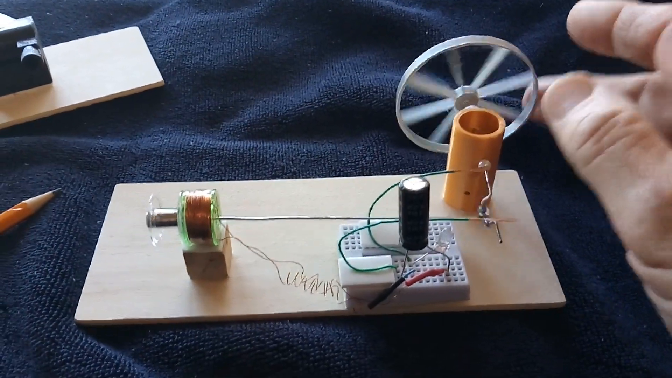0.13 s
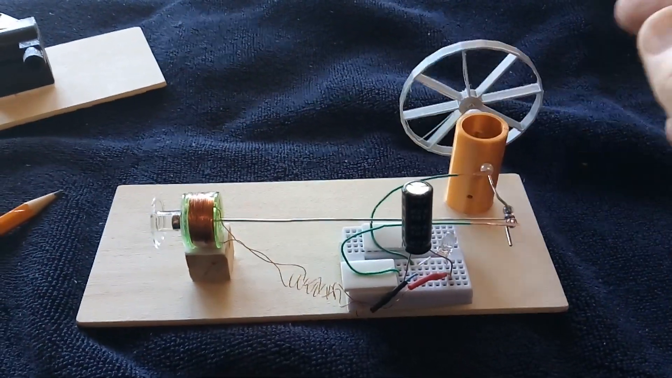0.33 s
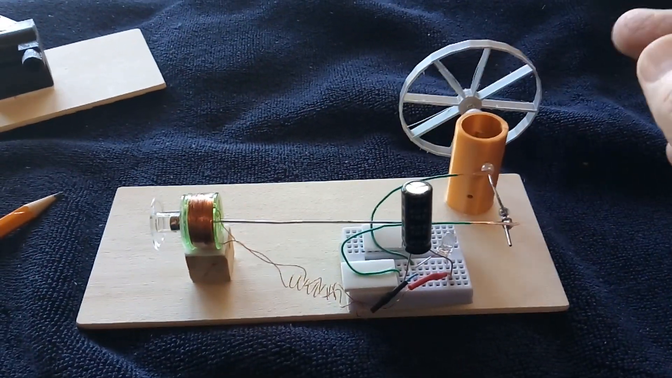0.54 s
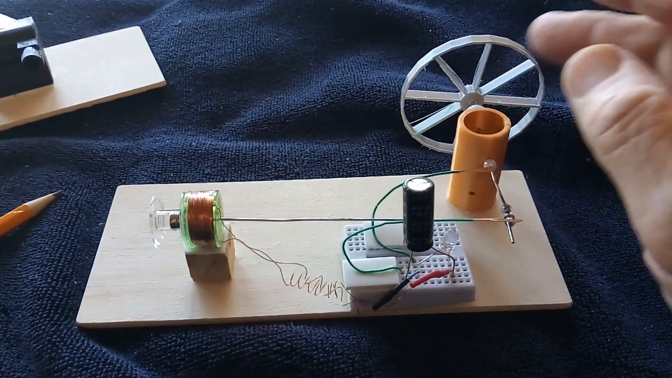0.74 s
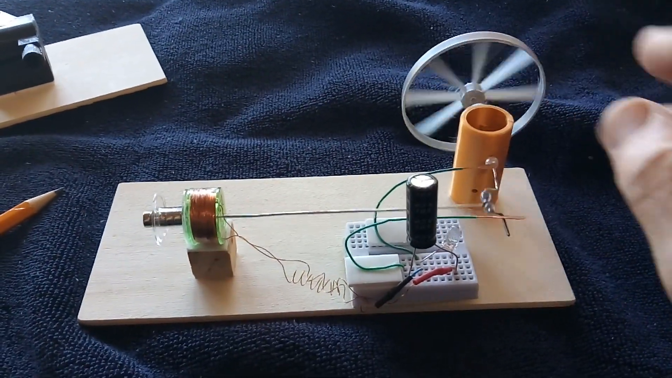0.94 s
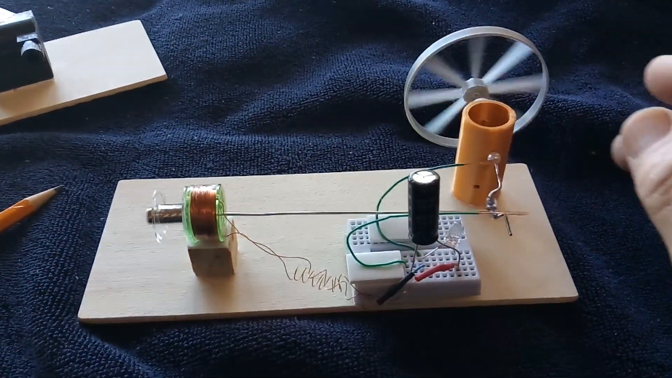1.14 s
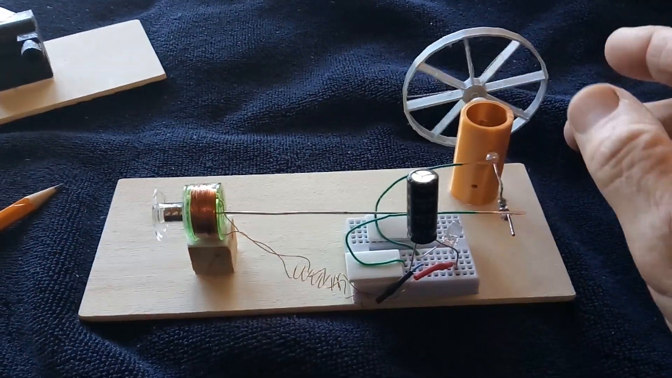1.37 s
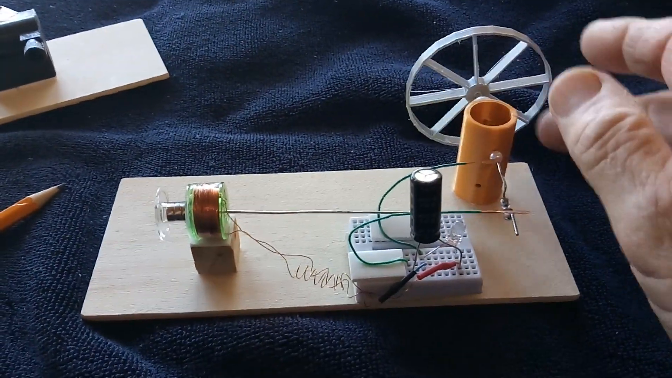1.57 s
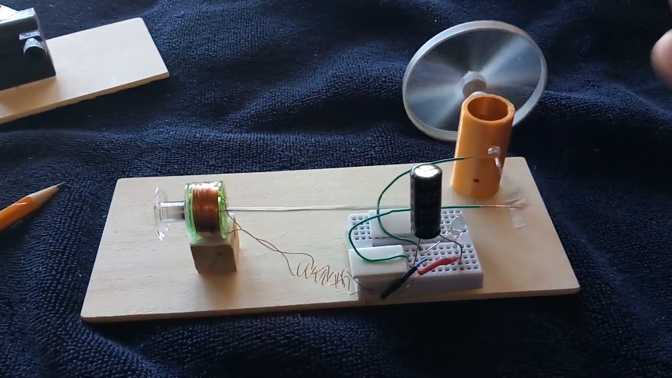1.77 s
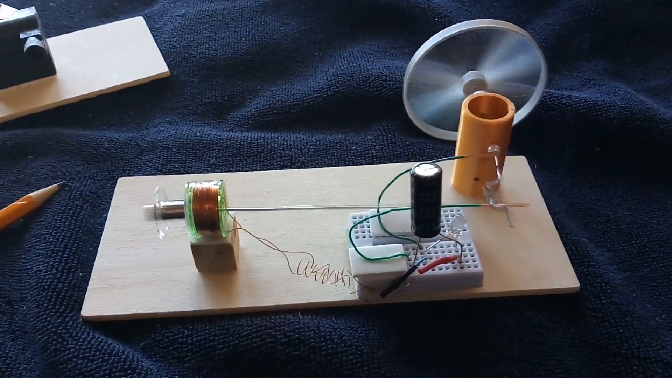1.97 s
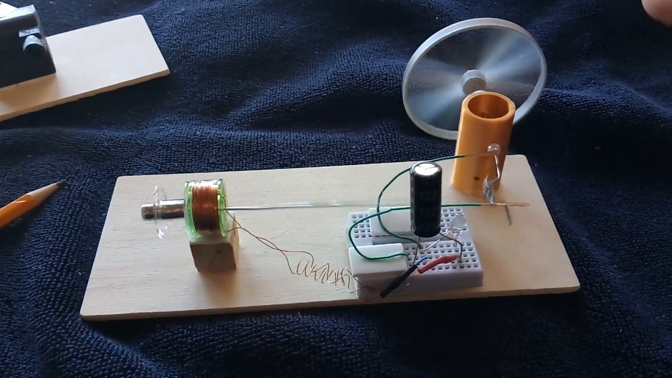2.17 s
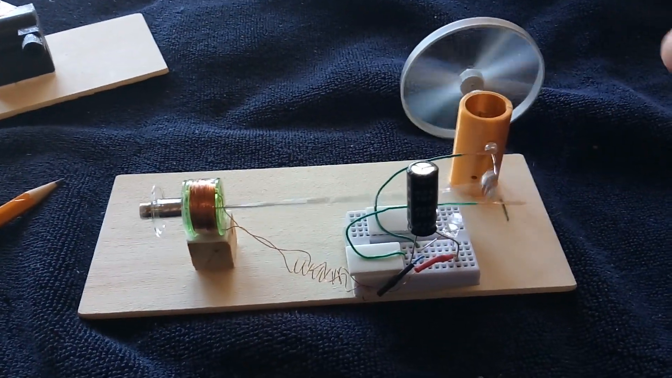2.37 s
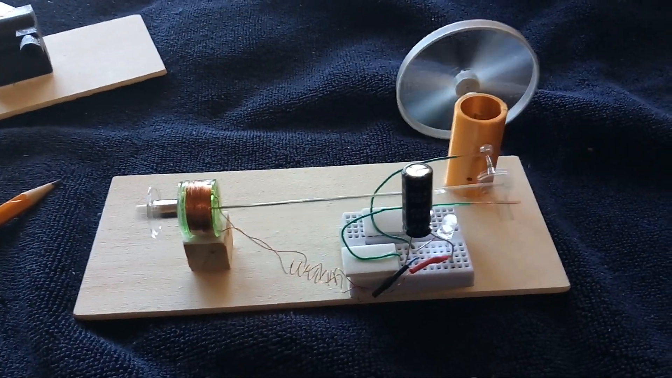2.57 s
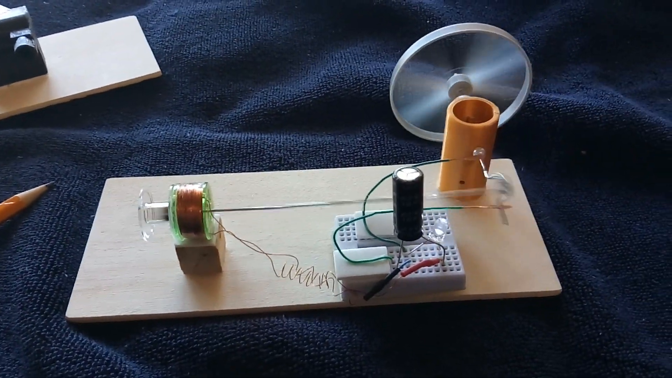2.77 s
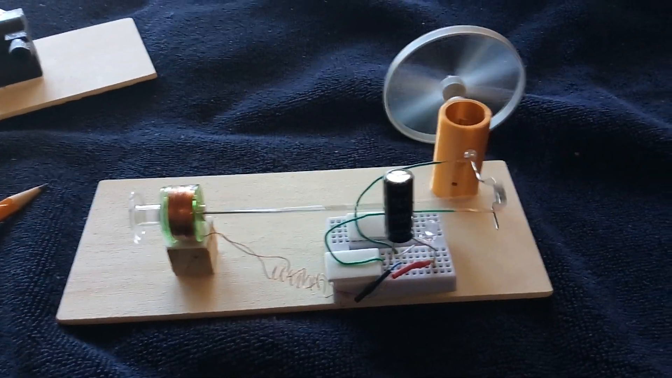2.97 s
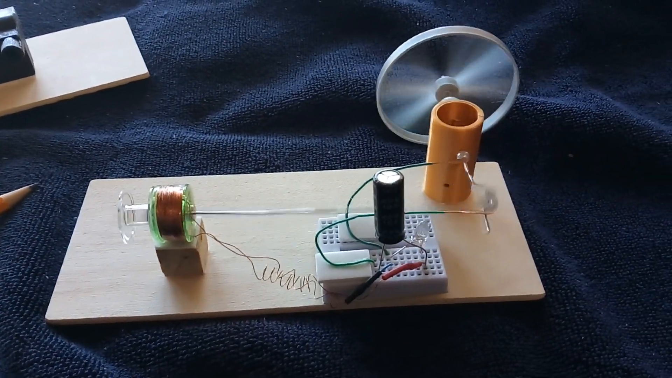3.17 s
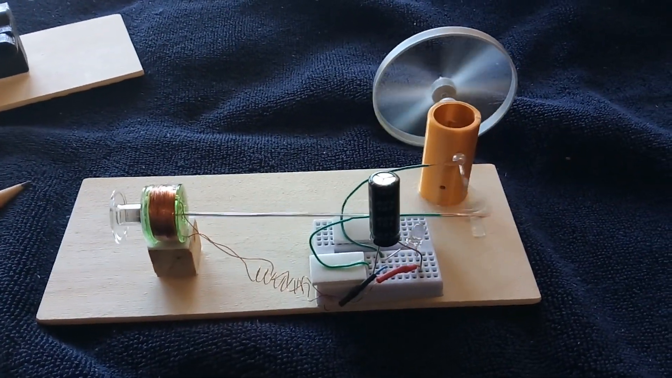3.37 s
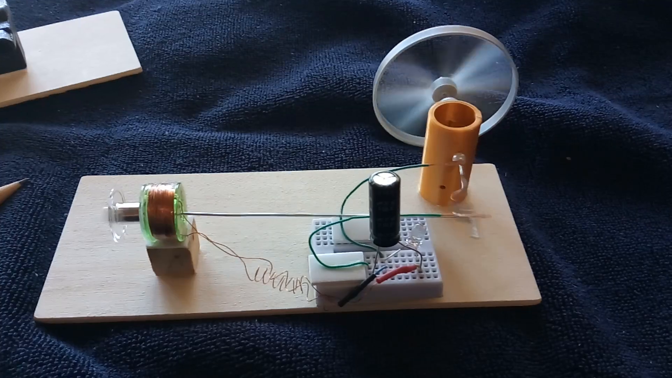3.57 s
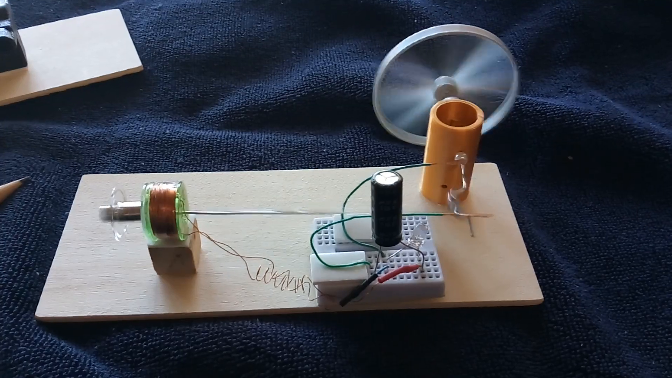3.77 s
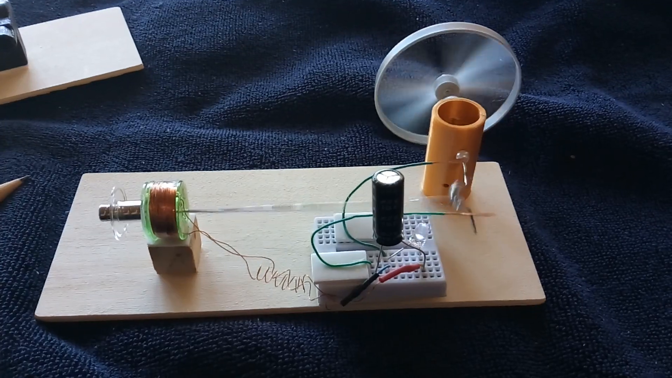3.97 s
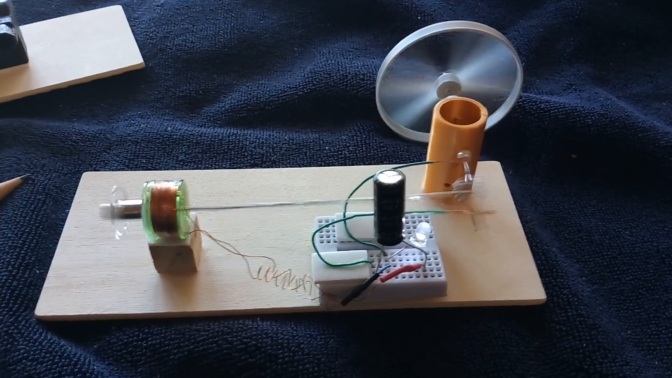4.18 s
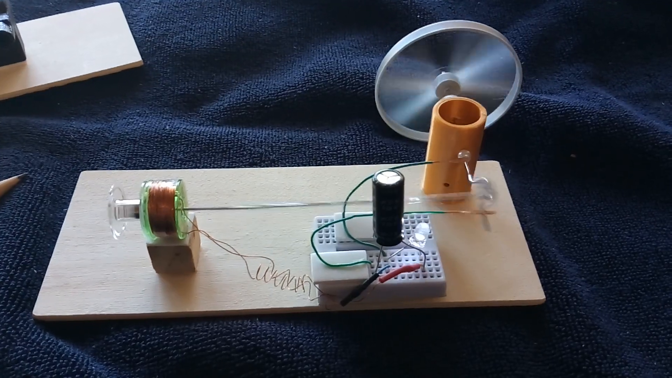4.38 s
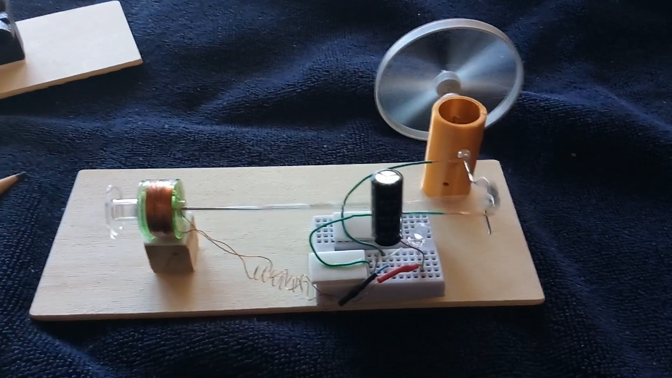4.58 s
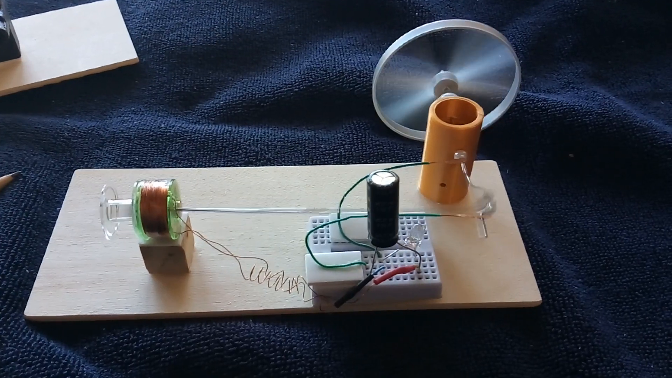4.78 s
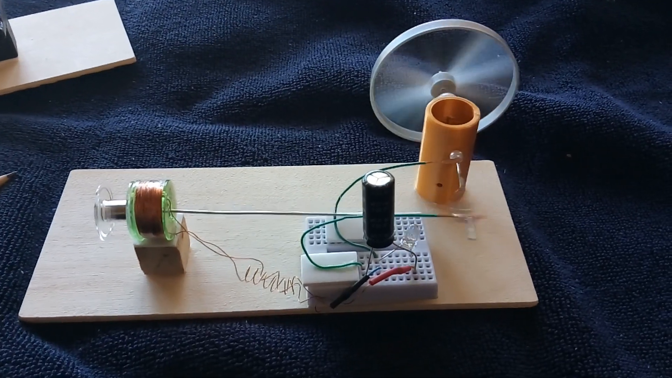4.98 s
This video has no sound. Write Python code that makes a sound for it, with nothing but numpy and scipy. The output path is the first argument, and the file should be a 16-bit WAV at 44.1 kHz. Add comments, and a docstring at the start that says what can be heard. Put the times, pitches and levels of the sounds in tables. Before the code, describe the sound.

Close up in a quiet room, a little metal flywheel is rocked, making soft taps and a faint scrape. Then the small electric engine it belongs to starts, and its steel rod and loose crank chatter in a fast, regular clicking that resonates through a wooden base. Toward the end, extra knocks join in and the clatter gets louder and sharper.

```python
"""Small solenoid engine on a wooden board, close to a hand-held microphone in a quiet room.
A finger flicks the flywheel, the linkage knocks a few times, then the coil catches and pulls about
nine times a second. Each pull makes the loose crank chatter, ringing the board and the steel rod.
Later the play grows: the rod also knocks on its way back and just ahead of each stroke."""
import sys
import numpy as np
from scipy import signal
from scipy.fft import rfft, irfft
from scipy.io import wavfile

SR = 44100
rng = np.random.default_rng(int(sys.argv[2]) if len(sys.argv) > 2 else 0)


def digitize_waveform(pressure):
    """Quantize a signal to 16-bit integers and store it at the path in sys.argv[1].

    Rows of a 2-D input are taken as channels; values are limited to [-1, 1].
    """
    field = np.atleast_2d(pressure).T
    bounded = np.clip(field, -1, 1)
    quanta = np.round(bounded * 32767).astype(np.int16)
    wavfile.write(sys.argv[1], SR, quanta)


N = 221081
TIME = np.arange(N) / SR
RING_SAMPLES = 2048
LOOSE_FROM_S = 4.27

# flywheel speed from the first pull on (time [s], speed [turns/s])
SPEED = [(1.74, 7.42), (1.957, 9.329), (2.202, 9.432), (2.466, 9.439), (2.949, 9.189), (3.042, 9.534),
         (4.287, 9.253), (4.573, 9.478), (4.688, 9.17)]


def undb(db):
    """Decibels to gain."""
    return 10 ** (np.asarray(db) / 20)


def level(x, db):
    """Scale to an rms level."""
    return x * undb(db) / np.sqrt(np.mean(x ** 2))


def add(out, t, x):
    """Mix x into out from time t."""
    i = int(np.clip(t * SR, 0, N))
    out[i:i + len(x)] += x[:N - i]


def turn_starts():
    """Times at which the flywheel starts a turn and the coil fires."""
    times, rates = np.transpose(SPEED)
    running = TIME[TIME >= times[0]]
    turns = np.cumsum(np.interp(running, times, rates)) / SR
    return np.interp(np.arange(int(turns[-1]) + 1), turns, running)


def each_turn(phase, scatter_s):
    """Times at which the crank passes one phase, given in turns."""
    starts = turn_starts()
    return starts[:-1] + phase * np.diff(starts) + scatter_s * rng.standard_normal(len(starts) - 1)


def force_at(curve, t):
    """Board and steel levels of a force curve at time t."""
    times, board_db, steel_db = np.transpose(curve)
    return np.interp(t, times, board_db), np.interp(t, times, steel_db)


def body(modes, low_hz, high_hz, order):
    """Response of damped modes (frequency [Hz], width [Hz], gain [dB]) radiating between two edges."""
    s = 1j * np.fft.rfftfreq(RING_SAMPLES, 1 / SR)
    ring = sum(undb(db) * s * width / (s * s + s * width + hz * hz) for hz, width, db in modes)
    b, a = signal.butter(order, [low_hz, high_hz], "band", analog=True)
    return ring * np.polyval(b, s) / np.polyval(a, s)


def chatter(response, delays_s, sizes, db, span_s=.008):
    """Quick contacts ring a body; db is the level of their energy spread over span_s."""
    hz = np.fft.rfftfreq(RING_SAMPLES, 1 / SR)
    force = sizes @ np.exp(-2j * np.pi * np.outer(delays_s, hz))
    ring = irfft(response * force)
    return ring * undb(db) * np.sqrt(span_s * SR / np.sum(ring ** 2))


def blow(bodies, contacts, chatter_hz, levels_db, uneven_db=2.0):
    """Metal bounces in a loose joint: the board knocks, the rod rings, the contact faces crack."""
    delay, scatter, board_db, steel_db = np.transpose(contacts)
    chance = rng.standard_normal((3, len(delay)))
    delays_s = np.abs(delay + scatter * chance[0]) / chatter_hz
    board = undb(board_db + uneven_db * chance[1])
    steel = undb(steel_db + uneven_db * chance[2])
    parts = zip(bodies, (board, steel, steel), levels_db)
    return sum(chatter(part, delays_s, sizes, db) for part, sizes, db in parts)


def stick_slip(grain_db=-6.5, density=.056):
    """Force of a sliding contact: dense tiny slips of uneven size."""
    slips = rng.standard_normal(N) * undb(grain_db * np.minimum(rng.exponential(size=N), 4))
    return slips * (rng.random(N) < density)


def rub(response, force, db):
    """A friction force rings a body, at an rms level."""
    return level(signal.fftconvolve(force, irfft(response))[:N], db)


def room_tone(air_db=-65.5, waver_db=-3.0):
    """Soft steady air noise with a faint wavering hum."""
    # air spectrum (frequency [Hz], relative density [dB])
    spectrum = [(25, -11.5), (45, -8), (70, -2), (115, 0.5), (170, -2.5), (380, -6), (500, -13.5),
                (1000, -15.5), (3000, -20.5), (6500, -23.5), (8700, -36.5), (13700, -38), (15200, -25)]
    # hum and a thin whine (frequency [Hz], level [dB])
    hum = [(118, -85.5), (296, -79.5), (355.3, -76), (414, -80), (8226, -93.5)]
    hz, db = np.transpose(spectrum)
    colour = undb(np.interp(np.log(np.fft.rfftfreq(N, 1 / SR) + 1), np.log(hz), db))
    out = level(irfft(rfft(rng.standard_normal(N)) * colour, N), air_db)
    for hz, db in hum:
        waver = np.interp(TIME, np.linspace(0, N / SR, 20), rng.standard_normal(20))
        tone = np.sin(2 * np.pi * (hz * TIME + rng.random()))
        out += level(tone * undb(waver_db * waver), db)
    return out


def sliding(bodies, levels_db=(-4, -3, -24)):
    """Axle and plunger friction: a swell for each rock of the wheel, then a steady hiss."""
    # finger rocks the wheel (time [s], length [s], peak gain [dB])
    rocks = [(0.168, 0.12, -72), (0.778, 0.41, -65), (1.15, 0.36, -75.5)]
    # friction while running (time [s], gain [dB])
    slide = [(1.6, -90), (1.68, -52.5), (3, -52.5), (5, -57.5)]
    force = stick_slip(grain_db=5.0, density=.05)
    hiss = sum(rub(part, force, db) for part, db in zip(bodies, levels_db))
    motion = undb(np.interp(TIME, *np.transpose(slide))) * (TIME > slide[0][0])
    for t, length_s, db in rocks:
        add(motion, t, undb(db) * np.sin(np.linspace(0, np.pi, int(length_s * SR))))
    return hiss * motion


def axle_bumps(scatter_s=.00006, rebound_db=-4):
    """The rocking axle bumps its bearing, rings the post and settles in weakening rebounds."""
    # bumps (time [s], level [dB], rebound interval [s])
    bumps = [(0.2456, -54.5, 0.00099), (.858, -64, 0.00099), (0.8842, -41, 0.003), (.8917, -42, 0.0011),
             (0.9415, -57.5, 0.00047), (1.1782, -46, 0.00091)]
    # wheel post modes (frequency [Hz], width [Hz], gain [dB])
    post_modes = [(690, 110, 9), (970, 150, 9.5), (2080, 120, 5.5), (2420, 280, -23), (4480, 190, 0)]
    post = body(post_modes, low_hz=580, high_hz=4200, order=4)
    out, bounces = np.zeros(N), np.arange(4)
    for t, db, interval_s in bumps:
        delays_s = bounces * (interval_s + scatter_s * rng.standard_normal())
        add(out, t, chatter(post, delays_s, undb(rebound_db * bounces), db))
    return out


def clack(bodies, board_db, steel_db, crack_db=-28, chatter_hz=1020):
    """One knock of the rod in its play."""
    # bounces (delay [chatter periods], scatter [chatter periods], board gain [dB], steel gain [dB])
    contacts = [(0, 0.0069, -7.5, -5), (0.879, 0.044, -8, -7), (2.401, 0.36, -7.5, -8),
                (3, 0.38, -6.5, -23), (4.7, 0.596, -15, -27)]
    return blow(bodies, contacts, chatter_hz, (board_db, steel_db, steel_db + crack_db))


def stray_knocks(bodies):
    """The slack linkage knocks as the wheel is flicked, the coil catches and the joint works loose."""
    # knocks (time [s], board level [dB], steel level [dB])
    knocks = [(0.8835, -47, -40), (1.7089, -46.5, -45), (1.7992, -36, -38), (1.915, -48, -52),
              (1.992, -36.5, -32.5), (4.23, -30.5, -32.5)]
    out = np.zeros(N)
    for t, board_db, steel_db in knocks:
        add(out, t, clack(bodies, board_db, steel_db))
    return out


def contact_wire(scatter_s=.0007, brush_s=.00219, uneven_db=3.5):
    """The crank brushes the springy contact wire, which pings softly."""
    # wire modes (frequency [Hz], width [Hz], gain [dB])
    wire_modes = [(4620, 370, 3), (5530, 1100, -9), (6070, 320, 9), (6270, 310, -21)]
    # drag as the wheel swings back (time [s], level [dB])
    drag = [(.98, -99), (1.02, -62), (1.035, -61.5), (1.055, -76), (1.1, -72), (1.16, -91)]
    # touches before each stroke (phase [turns], level [dB])
    touches = [(.85, -48), (.928, -51), (.966, -82)]
    wire = body(wire_modes, low_hz=4670, high_hz=7530, order=3)
    out = rub(wire, stick_slip(), 0) * undb(np.interp(TIME, *np.transpose(drag)))
    for phase, db in touches:
        for t in each_turn(phase, scatter_s):
            delays_s, sizes = brush_s * rng.random(size=6), rng.standard_normal(size=6)
            add(out, t, chatter(wire, delays_s, sizes, db + uneven_db * rng.standard_normal()))
    return out


def sizzle(sizzle_db=-62, lead_s=.024, length_s=.059, uneven_db=1.5, speed_power=4.3):
    """A faint, very high sizzle swells around each stroke, stronger at speed."""
    band = body([(15100, 600, 0)], low_hz=14100, high_hz=15700, order=2)
    gate, swell = np.zeros(N), np.hanning(int(length_s * SR))
    for t in turn_starts():
        speed_ratio = np.interp(t, *np.transpose(SPEED)) / SPEED[-1][1]
        gain = speed_ratio ** speed_power * undb(uneven_db * rng.standard_normal())
        add(gate, t - lead_s, swell * gain)
    return gate * rub(band, stick_slip(), sizzle_db)


def strokes(bodies, chatter_hz=1033, spread=.039, loose_lag_s=.0047,
            crack_db=-29, thud_db=-25, knee_db=-26, hardening=3.13):
    """The coil snatches the plunger through the slack; hard pulls crack brighter and jolt the board."""
    # pull eases, then grows as the joint loosens (time [s], board level [dB], steel level [dB])
    pull = [(1.74, -30.5, -34), (1.92, -25, -26), (2.75, -26.5, -29.5), (3.05, -26.5, -28.5),
            (3.75, -29, -29.5), (4.22, -30, -36.5), (4.43, -23.5, -22.5), (4.97, -22, -24)]
    # bounces (delay [chatter periods], scatter [chatter periods], board gain [dB], steel gain [dB])
    contacts = [(0, 0.029, -5, -3), (.84, 0.032, -1, -11), (1.03, 0.028, -6, -36), (1.502, 0.145, -14.5, 1),
                (1.968, 0.1, -3, -12.5), (2.602, 0.151, -8.5, -3), (4.6, 0.452, -11, -8.5),
                (5.4, 0.422, -11, -3.5)]
    jolt = body([(437, 340, -25), (677, 124, -1)], low_hz=360, high_hz=787, order=2)
    out = np.zeros(N)
    for start in turn_starts():
        t = start + loose_lag_s * (start > LOOSE_FROM_S)
        board_db, steel_db = force_at(pull, t)
        bounce_hz = chatter_hz * (1 + spread * rng.standard_normal())
        force_db = board_db + hardening * max(board_db - knee_db, 0)
        add(out, t, blow(bodies, contacts, bounce_hz, (board_db, steel_db, force_db + crack_db)))
        add(out, t, chatter(jolt, np.zeros(1), np.ones(1), force_db + thud_db))
    return out


def linkage_ticks(bodies, trim_db=-2.0, scatter_s=.0008, uneven_db=4.0, chatter_hz=1150):
    """Light contacts come round at the same crank angles on every turn."""
    # ticks before trim (phase [turns], board level [dB], steel level [dB], crack level [dB])
    ticks = [(.095, -41, -42, -70), (.175, -41.5, -50, -85), (0.234, -54.5, -66, -86),
             (0.312, -63, -69, -85), (0.349, -52.5, -65, -88), (0.461, -52.5, -45.5, -98),
             (0.498, -43, -54, -100), (.56, -50.5, -68, -88), (.73, -44, -87, -98)]
    # bounces (delay [chatter periods], scatter [chatter periods], board gain [dB], steel gain [dB])
    contacts = [(0, 0.07, 11.5, 3), (0.902, 0.078, -3.5, 4), (2.2, 0.55, 10.5, -26)]
    out = np.zeros(N)
    for phase, *base_db in ticks:
        for t in each_turn(phase, scatter_s):
            levels_db = np.array(base_db) + trim_db + uneven_db * rng.standard_normal()
            add(out, t, blow(bodies, contacts, chatter_hz, levels_db))
    return out


def plunger_scrape(bodies, phase=.655, scatter_s=.0008, length_s=.0029,
                   board_db=-44, steel_db=-54, squeak_db=-61):
    """At the end of its travel the plunger scrapes in the coil, with a thin high squeak."""
    board, steel, _ = bodies
    squeak = body([(10160, 1100, 0)], low_hz=8900, high_hz=11500, order=2)
    out = np.zeros(N)
    for t in each_turn(phase, scatter_s):
        delays_s, sizes = length_s * rng.random(size=9), rng.standard_normal(size=9)
        for part, db in ((board, board_db), (steel, steel_db), (squeak, squeak_db)):
            add(out, t, chatter(part, delays_s, sizes, db))
    return out


def rebounds(bodies, from_s=2.25, after_s=.0215, scatter_s=.003,
             board_db=-40.5, steel_db=-42, uneven_db=1.5):
    """At full speed, until the joint works loose, the rod bounces back once after each stroke."""
    out, starts = np.zeros(N), turn_starts()
    for t in starts[(starts > from_s) & (starts < LOOSE_FROM_S)]:
        late, hard = rng.standard_normal(2)
        knock = clack(bodies, board_db + uneven_db * hard, steel_db + uneven_db * hard)
        add(out, t + after_s + scatter_s * late, knock)
    return out


def return_knocks(bodies, phase=.438, scatter_s=.0003, ping_db=-8):
    """Once the play has grown, the rod falls through it on every way back, with a short ping."""
    # return force (time [s], board level [dB], steel level [dB])
    force = [(3.7, -53, -47), (3.83, -33, -34.5), (4.05, -37, -38.5), (4.18, -28.5, -26.5),
             (4.9, -36, -28.5)]
    ping = body([(4640, 120, 0)], low_hz=4200, high_hz=5300, order=2)
    out = np.zeros(N)
    for t in each_turn(phase, scatter_s):
        if t > force[0][0]:
            board_db, steel_db = force_at(force, t)
            add(out, t, clack(bodies, board_db, steel_db))
            add(out, t, chatter(ping, np.zeros(1), np.ones(1), steel_db + ping_db))
    return out


def early_knocks(bodies, lead_s=.0062, scatter_s=.0005, board_db=-36.5, steel_db=-34.5):
    """The loose joint knocks just ahead of each stroke."""
    out, starts = np.zeros(N), turn_starts()
    for t in starts[starts > LOOSE_FROM_S]:
        add(out, t - lead_s + scatter_s * rng.standard_normal(), clack(bodies, board_db, steel_db))
    return out


def frame(x, notch_hz=2870, notch_q=14, notch_depth=.55):
    """Metal parts ring in sympathy through the frame; the board radiates less at one antiresonance."""
    # copper post and flywheel modes (frequency [Hz], width [Hz], gain [dB])
    modes = [(3640, 10, 4), (4440, 13, -25), (8330, 97, 4)]
    x = x + sum(undb(db) * signal.lfilter(*signal.iirpeak(hz, hz / width, fs=SR), x)
                for hz, width, db in modes)
    return x - notch_depth * signal.lfilter(*signal.iirpeak(notch_hz, notch_q, fs=SR), x)


def room(x, near_db=-14.0, near_t60_s=.067, far_db=-18.0, far_t60_s=.24, gap_s=.003, places=9):
    """Near reflections and a short tail; their pattern changes as the microphone drifts."""
    t, out = TIME[:SR // 2], x
    for place in range(places):
        response = 0
        for db, t60_s in ((near_db, near_t60_s), (far_db, far_t60_s)):
            tail = rng.standard_normal(len(t)) * np.exp(-np.log(1000) * t / t60_s) * (t > gap_s)
            response = response + undb(db) * tail / np.linalg.norm(tail)
        nearness = np.maximum(1 - np.abs(np.linspace(0, places - 1, N) - place), 0)
        out = out + signal.oaconvolve(x * np.sqrt(nearness), response)[:N]
    return out


def scene():
    """The linkage strikes and rubs board, rod and contact faces in a quiet room."""
    # modes of board, rod and contact faces (frequency [Hz], width [Hz], gain [dB])
    board_modes = [(711, 113, 3.5), (917, 145, 1), (1049, 320, 5.5), (1423, 175, -2), (1684, 510, -4),
                   (1953, 390, -1.5), (2420, 44, -8), (2580, 25, -1.5), (3000, 65, -6.5),
                   (3760, 120, -10.5), (4860, 37, -34.5)]
    steel_modes = [(4394, 430, 0), (5400, 660, -7.5), (5920, 134, 3.5), (6210, 390, 3.5), (6500, 400, 5.5),
                   (7520, 130, -37)]
    crack_modes = [(8620, 1550, 5), (10500, 1500, -12), (10400, 1200, -8), (14600, 700, -3)]
    bodies = (body(board_modes, low_hz=523, high_hz=3610, order=3),
              body(steel_modes, low_hz=4367, high_hz=7190, order=4),
              body(crack_modes, low_hz=6760, high_hz=15700, order=2))
    play = stray_knocks(bodies) + rebounds(bodies) + return_knocks(bodies) + early_knocks(bodies)
    knocks = axle_bumps() + strokes(bodies) + play + linkage_ticks(bodies)
    rubbing = plunger_scrape(bodies) + contact_wire() + sizzle() + sliding(bodies)
    return (room(frame(knocks + rubbing)) + room_tone())[None]


def record(dry):
    """Steep low-pass at 15.55 kHz."""
    return signal.sosfilt(signal.ellip(8, .2, 70, 15550, fs=SR, output="sos"), dry)


dry = scene()
out = record(dry)
digitize_waveform(out)
```